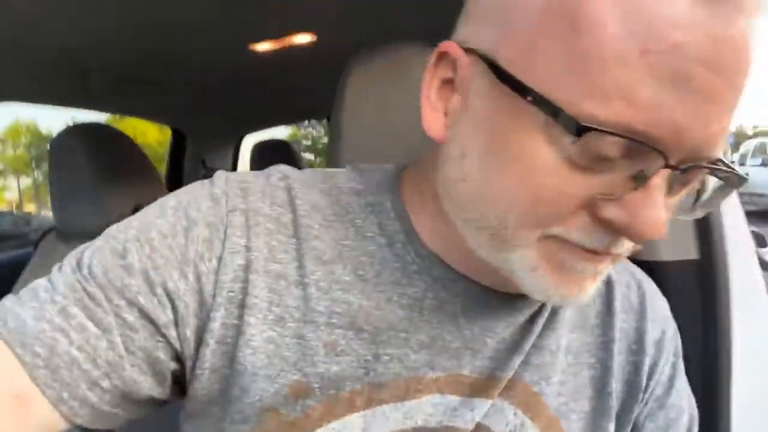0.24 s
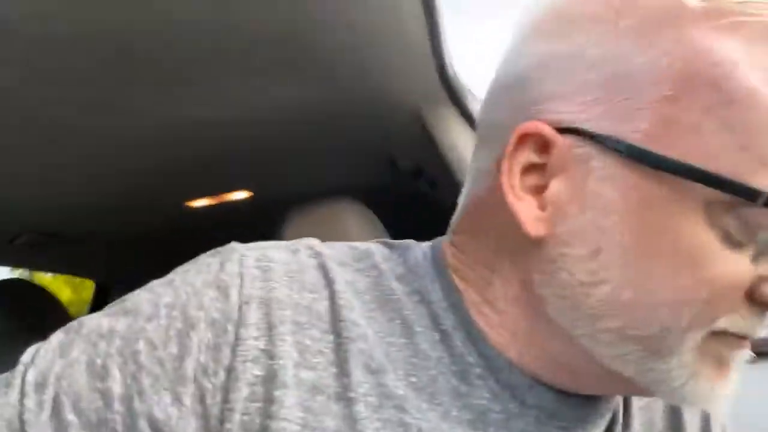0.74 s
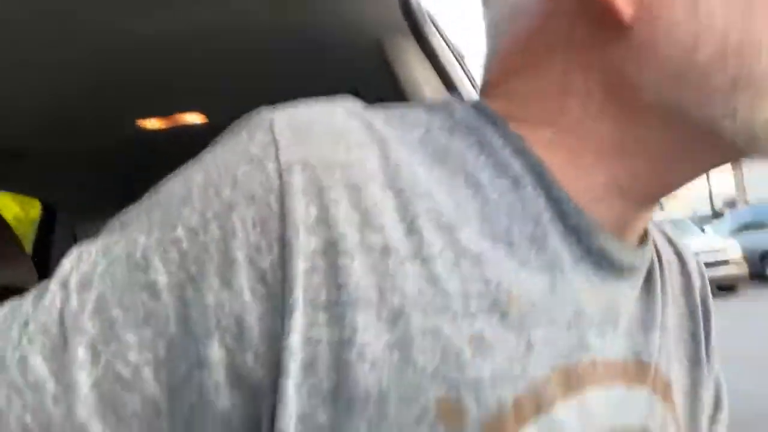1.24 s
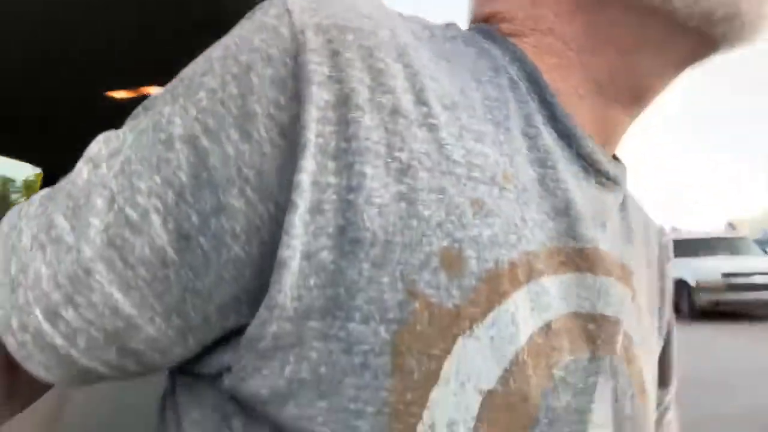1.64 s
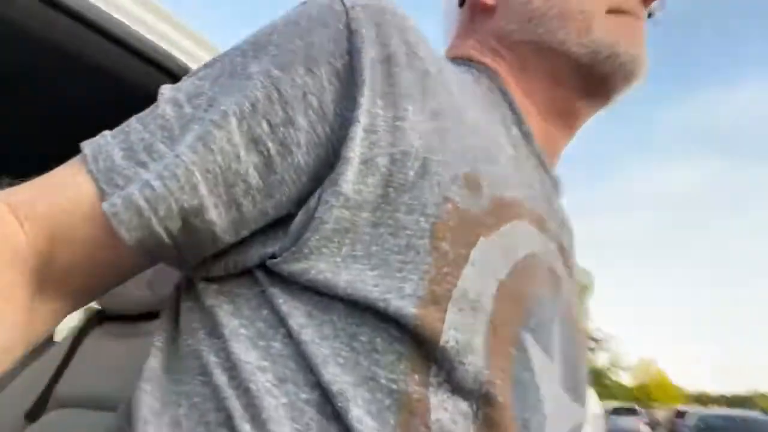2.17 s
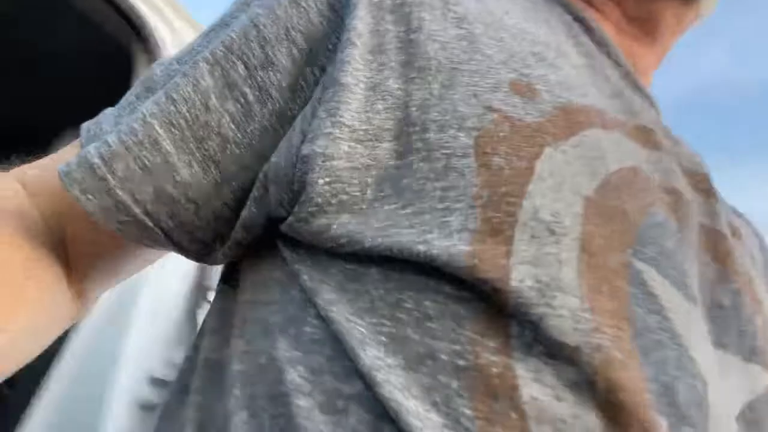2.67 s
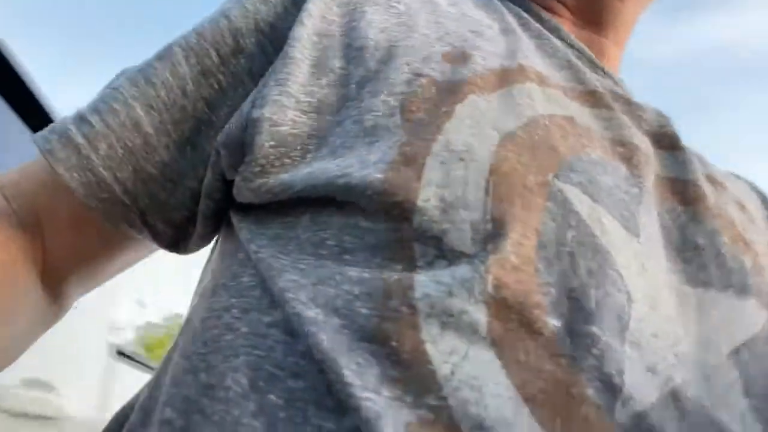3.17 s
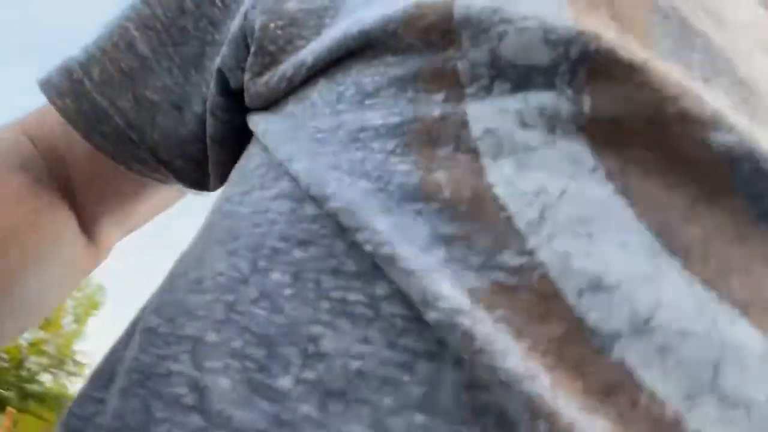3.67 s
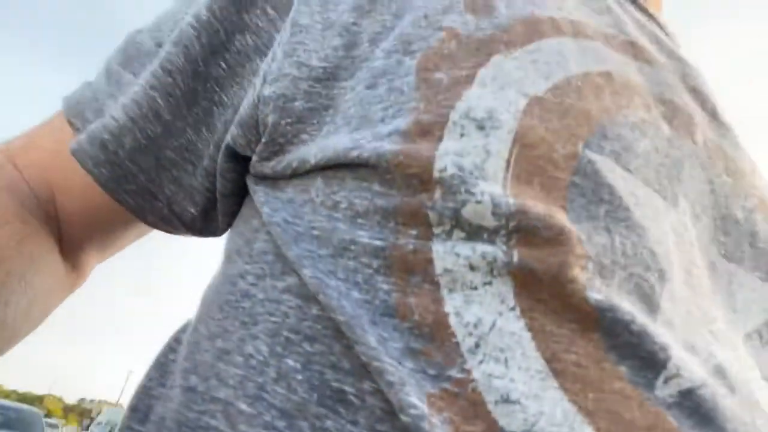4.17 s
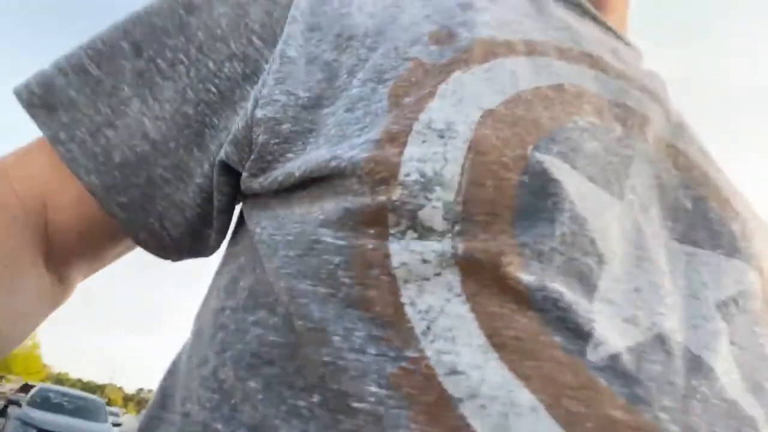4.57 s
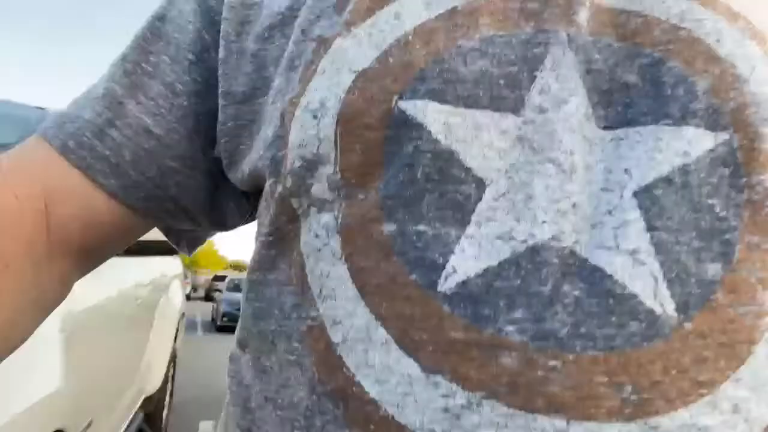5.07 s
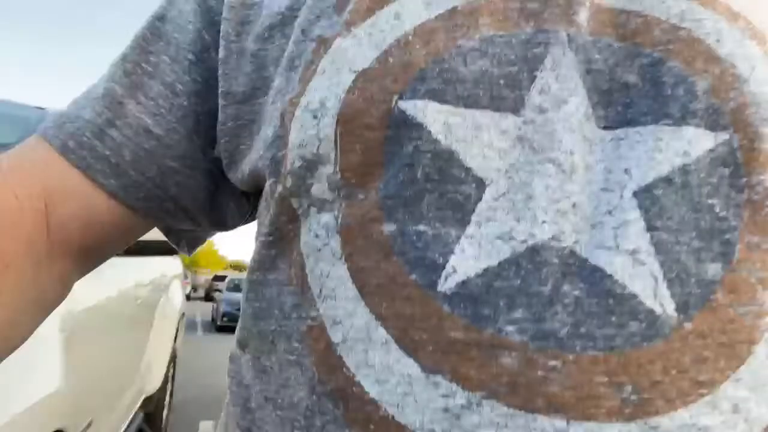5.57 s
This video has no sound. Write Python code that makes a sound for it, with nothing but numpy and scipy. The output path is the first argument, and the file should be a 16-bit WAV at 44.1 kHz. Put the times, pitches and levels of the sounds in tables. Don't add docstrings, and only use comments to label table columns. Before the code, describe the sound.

Two heavy car doors slam a few seconds apart in a parking lot, over low traffic rumble, faint hum and small handling clicks.

```python
import sys
import numpy as np
from scipy import signal
from scipy.fft import rfft, irfft
from scipy.io import wavfile
from scipy.ndimage import uniform_filter1d, minimum_filter1d

SR = 44100
rng = np.random.default_rng(int(sys.argv[2]) if len(sys.argv) > 2 else 0)


def natural_amplitude(level_db):
    exponent = np.asarray(level_db, float) / 20
    return 10 ** exponent


def wav_record(signal):
    frames = np.transpose(np.atleast_2d(signal))
    bounded = np.clip(frames, -1, 1)
    quanta = np.round(bounded * 32767).astype(np.int16)
    wavfile.write(sys.argv[1], SR, quanta)


N = 256397

# frequency in Hz, level in dB per Hz.
TRAFFIC = [(70, -30.5), (120, -8.5), (170, -12), (245, -17.5), (300, -23), (400, -30), (600, -30.5),
           (1300, -38.5), (2000, -40), (2350, -49.5), (4000, -51.5), (6200, -83), (7400, -69), (9000, -92)]
# frequency in Hz, level in dB per Hz.
RUMBLE = [(12, -20.5), (25, -5), (40, 2.5), (60, 3.5), (90, 5.5), (130, -8.5), (200, -21.5), (300, -68.5)]
# frequency in Hz, level in dB per Hz.
FIBRES = [(590, -27.5), (1000, -4), (1150, -8), (1650, -4), (2090, -11), (6470, -20), (7400, -14.5),
          (9620, -61), (16300, -120)]
# time in seconds, level in dB.
MOVEMENT = [(0.0, -53.5), (0.37, -47), (0.62, -49), (0.99, -46), (1.6, -42), (1.87, -48), (2.5, -53.5),
            (2.81, -49.5), (2.96, -55), (3.66, -52.5), (3.99, -54), (4.3, -50), (4.62, -51.5), (4.91, -51),
            (5.81, -53.5)]
# time in seconds, pitch in Hz, level in dB.
HUM = [(0.0, 108.9, -55), (0.2, 108.2, -36.5), (0.58, 114.5, -37.5), (0.71, 108.9, -44.5),
       (1.6, 109.6, -42), (2.07, 111.1, -35.5), (2.74, 111.9, -38.5), (2.9, 108.5, -43.5),
       (4.24, 108.6, -33.5), (4.3, 110, -52), (4.65, 110.9, -38.5), (5.254, 113.7, -32), (5.6, 110.9, -40),
       (5.81, 105, -45)]
# frequency in Hz, level in dB.
HUM_OVERTONES = [(285.3, -56.5), (376.8, -65.5), (495.3, -79.5)]
# start in seconds, peak in dB, pitch in Hz, length in cycles.
THUMPS = [(0.027, -20.5, 90, 1.9), (0.552, -21, 66, 2.5), (0.82, -47, 61, 3.7), (1.13, -12, 38.6, 1.3),
          (1.11, -11, 29, 2.2), (4.38, -12, 30, 1.8), (1.241, -15, 48, 5.5), (2.619, -25, 74.5, 4.4),
          (3.962, -20.5, 68, 3.4), (4.207, -18, 60, 2.3), (5.496, -25.5, 56.5, 2.8)]
# frequency in Hz, level in dB per Hz.
CLOTH = [(300, -26.5), (600, -5.5), (1200, -4), (2100, -9.5), (4000, -15.5), (7400, -21.5)]
# start in seconds, length in seconds, level in dB, treble dullness in dB.
SWISHES = [
    (1.151, 0.27, -46, -6),
    (1.613, 0.19, -43.5, -0.5),
    (2.014, 0.074, -52, -1),
    (2.864, 0.095, -54, 2),
    (3.428, 0.18, -49.5, 16),
    (3.7, 0.15, -58, -1),
    (4.121, 0.13, -55.5, -2),
    (4.313, 0.038, -50, 0),
    (4.429, 0.22, -51.5, 4.5),
    (5.597, 0.15, -54.5, 7),
]
# time in seconds, level in dB, upper resonance in Hz.
CREAKS = [
    [(0.255, -59, 1850), (0.29, -47, 1950), (0.303, -50, 1930), (0.322, -42, 2040), (0.35, -47, 2060),
     (0.385, -56, 2050)],
]
# start in seconds, peak in dB, ring in Hz, decay t60 in seconds.
TRIM = [(.0802, -42.5, 3340, 0.014), (.3464, -41, 4540, 0.033), (.5736, -44, 5800, 0.04),
        (1.4197, -35, 6360, 0.058), (1.4676, -22, 1890, 0.042), (1.483, -28, 2552, .057),
        (1.6033, -33, 2390, 0.066), (2.0612, -46, 1550, 0.049), (2.0906, -44.5, 1710, 0.061),
        (2.2348, -45, 2602, 0.0063), (2.236, -36, 3300, 0.015), (2.3935, -48, 4320, 0.038),
        (2.642, -30.5, 1300, .012), (2.6863, -42, 4600, 0.026), (2.9148, -45, 4060, 0.043),
        (3.9514, -43, 2546, .028), (4.125, -44.5, 3580, 0.04), (4.2423, -37.5, 2840, 0.052),
        (4.479, -32.5, 2300, 0.041), (4.49, -33.5, 4270, 0.077), (4.52, -36, 3300, 0.03),
        (4.563, -39.5, 2720, .028), (5.0529, -47, 1670, 0.024), (5.2525, -49.5, 1848, 0.025)]
# start in seconds, peak in dB, ring in Hz, decay t60 in seconds.
KEYS = [(.4614, -39, 4770, 0.052), (.857, -51, 1670, .028), (.9981, -40, 5500, 0.027),
        (1.2094, -31, 3850, .041), (1.2481, -41, 1820, 0.026), (1.3578, -29.5, 1870, 0.051),
        (1.4421, -30, 2880, 0.048), (1.9305, -41.5, 4620, 0.03), (2.6474, -26, 4560, 0.022),
        (2.6579, -27.5, 2800, 0.023), (3.9399, -36, 3530, 0.048), (4.8864, -45.5, 3800, .021)]
# start in seconds, peak in dB, ring in Hz, decay t60 in seconds.
BUCKLE = [(.17, -43.5, 3480, 0.13), (.19, -36, 1470, .11), (.1999, -29, 6350, 0.033),
          (.731, -32, 6800, 0.039), (.744, -37, 2820, 0.033), (.9398, -40, 3300, 0.028),
          (1.021, -36, 1640, 0.035), (1.07, -39, 1720, 0.028), (1.097, -38, 1364, 0.01),
          (1.294, -41, 4500, 0.044), (1.502, -20, 4600, 0.025), (1.511, -23, 1870, 0.037),
          (1.6666, -35.5, 4280, 0.035), (1.7314, -40, 3480, .038), (2.6114, -48, 3650, .027),
          (4.3206, -43, 2680, 0.033), (4.334, -41, 2910, .03)]
# start in seconds, peak in dB, ring in Hz, decay t60 in seconds.
PADDED = [
    (.9497, -36, 1670, .028),
    (2.3136, -46, 1560, 0.016),
    (2.3565, -52, 2550, 0.043),
    (2.9527, -46, 1410, 0.053),
    (3.236, -41, 2060, 0.022),
    (4.5394, -42.5, 4000, 0.022),
    (4.7536, -36.5, 3000, .013),
    (4.9945, -28.5, 3050, 0.021),
    (5.6346, -43.5, 1770, .032),
]
# start in seconds, peak in dB, ring in Hz, decay t60 in seconds.
TAPS = [
    (.724, -34, 1770, 0.032),
    (2.761, -43, 1400, 0.015),
    (3.458, -46, 1940, 0.045),
    (5.736, -36, 1611, 0.015),
]
# start in seconds, peak in dB, ring in Hz, decay t60 in seconds.
KNOCKS = [
    (.292, -59, 750, 0.03),
    (2.7337, -51.5, 452, 0.021),
    (3.241, -43, 720, 0.033),
    (3.242, -40, 513, 0.068),
    (3.834, -49, 595, 0.029),
]
# its contacts, low part in dB, high part in dB.
KINDS = [
    (TRIM, -25.5, -19),
    (KEYS, -22.5, -10),
    (BUCKLE, -8, -4.5),
    (PADDED, 0.5, -18),
    (TAPS, -3.5, -45),
    (KNOCKS, 19.7, -26),
]
# start in seconds, peak in dB, pitch in Hz, decay t60 in seconds.
PINGS = [(0.181, -50, 6300, 0.054), (.2, -43.5, 6980, 0.03), (.898, -44, 6440, 0.035), (.96, -60, 3300, .1),
         (1.246, -42, 3630, 0.052), (1.294, -33, 6200, 0.05), (1.503, -29, 1200, .03),
         (2.647, -36, 1600, .02), (2.648, -36, 6300, .02), (2.659, -37, 2050, .018),
         (1.358, -41, 4500, .03), (1.296, -45, 5670, 0.094), (1.445, -26, 6550, 0.036),
         (1.494, -38, 6020, .05), (1.503, -31, 885, 0.039), (1.596, -55, 5140, 0.18),
         (4.174, -47.5, 6480, 0.03), (4.341, -53.5, 5070, 0.076), (4.52, -37.5, 6600, 0.021)]
# start in seconds, peak in dB, pitch in Hz, decay t60 in seconds.
STRIKER = [(1.107, 0, 1373, .042), (1.09, -34, 1200, 0.043), (1.121, -17, 2800, .02),
           (1.160, -26, 1700, .06), (1.178, -30, 1550, .08), (1.178, -39, 2850, .08),
           (1.141, -20, 1950, .04), (4.386, -11, 800, 0.06), (4.412, -9.5, 473, .04),
           (1.1065, -5.5, 1916, .03), (1.109, -12.5, 3400, .02), (1.11, -6, 357, .07),
           (1.113, -17, 720, .04), (1.143, -21, 2550, .03), (1.140, -20.5, 2200, 0.036),
           (4.367, -18, 270, 0.045), (4.3805, -12.5, 3200, 0.028), (4.380, -19.5, 5800, .02),
           (4.4075, -9, 1570, .045), (4.409, -16, 2550, .03), (4.409, -19, 3600, .025),
           (4.369, -13, 380, .045), (4.379, -11, 180, .14), (4.384, -11.5, 255, .12),
           (4.4105, -5, 320, .035), (4.47, -20.5, 240, 0.18)]
# start in seconds, peak in dB, pitch in Hz, decay t60 in seconds.
TRIM_RINGS = [(.196, -36, 1440, 0.034), (.200, -41, 820, .03), (.200, -41, 2650, .025),
              (.462, -44, 4804, .03), (.724, -29, 1760, .035), (.724, -38, 1174, .02),
              (2.2347, -31.5, 2550, 0.021), (2.236, -34, 3300, .018), (2.236, -42.5, 1590, .04),
              (2.252, -46, 2600, .02), (2.314, -47, 1550, .025), (2.357, -47, 2600, .02),
              (2.394, -47, 2600, .02), (2.404, -50, 4300, 0.018), (2.611, -49, 4800, 0.017),
              (2.647, -27, 4565, .02), (2.648, -34, 5000, .025), (2.658, -34, 2750, .015),
              (2.659, -38, 3800, .014), (2.647, -35, 2100, .02), (2.647, -36, 3900, .02),
              (2.687, -48, 2650, 0.023), (2.735, -44, 1300, .02), (2.761, -32, 1500, .02),
              (2.762, -38, 684, .02), (2.761, -35, 1200, .016), (3.241, -37, 760, 0.037),
              (3.834, -35, 598, .025), (3.242, -38, 500, .04), (3.242, -40, 1000, .03),
              (3.459, -42, 1900, .04), (.293, -41, 750, .025), (3.835, -40, 1044, .03),
              (1.502, -22, 4650, .02), (1.502, -25, 2700, .02), (1.502, -27, 6300, .03),
              (1.512, -24, 2000, .035), (1.358, -36, 1900, .04), (1.468, -28, 2900, .025),
              (1.483, -34, 4000, .025), (1.604, -38, 2300, .04), (1.667, -40, 4500, .025),
              (4.521, -42, 2150, .03), (4.124, -51, 2540, .03), (4.163, -49, 2450, .04),
              (4.322, -45, 2500, .04), (4.995, -37, 1200, .03), (5.736, -38, 1600, .025)]
# peak time in seconds, level in dB, pitch in Hz, rise in seconds, t60 in seconds.
BOOMS = [
    (1.132, -5, 90, 0.022, 0.083),
    (1.183, -3, 63, .035, 0.1),
    (1.225, -19, 65, .02, 0.094),
    (1.301, -19, 80.06, .045, 1.04),
    (4.4, -7.5, 67, 0.0272, .1),
    (4.427, -10, 58, 0.0198, 0.25),
    (4.45, -18.5, 108.5, 0.028, 0.2),
    (4.559, -27.5, 56.6, .08, 0.92),
]
# frequency in Hz, level in dB, decay t60 in seconds.
FIRST_PANEL = [(90, 16.5, 0.2), (125.5, -2.5, 0.48), (204, -3, 0.43), (343, 2.5, 0.14), (480, -7, 0.12),
               (900, -19, 0.081), (1500, -33.5, .05)]
SECOND_PANEL = [(90, 7, 0.31), (130, -2.5, 0.63), (202, -4, 0.45), (286, 10.5, 0.13), (487, 2.5, 0.068),
                (930, -7.5, 0.13), (1544, -28.5, 0.044)]
# frequency in Hz, level in dB, decay t60 in seconds.
FIRST_RINGS = [(209.5, 5.9, 0.26), (347, 5.7, 0.023), (800, 2, 0.0069)]
SECOND_RINGS = [(184, -2, 0.044), (264, 0, 0.074), (338, -3, 0.051), (401, 11, 0.095), (800, 2, 0.016)]
# frequency in Hz, level in dB per Hz.
FIRST_LATCH = [(290, -20.5), (500, 3), (725, -22), (849, -17.5), (1220, -22), (1380, -18), (2210, -20.5),
               (3210, -22.5), (6390, -31.5), (7400, -29.5), (9620, -68), (16300, -120)]
SECOND_LATCH = [(290, -45), (500, -18.5), (803, -4.5), (1080, -14.5), (1580, -13), (2070, -16),
                (2560, -15.5), (2870, -18.5), (5840, -33.5), (7400, -26), (9620, -83.5), (16300, -120)]
# start in seconds, latch crack in dB, panel thud in dB, dullness in dB per octave.
FIRST_BLOWS = [
    (1.091, -30.5, -23, 3.5),
    (1.099, -22, -32, 7.5),
    (1.1065, -5.5, -15.5, 1.1),
    (1.113, -28.5, -10.5, 0),
    (1.121, -19, -18, 2.2),
    (1.138, -16, -15, 3),
    (1.158, -24.5, -30, 2.5),
    (1.215, -35.5, -18.5, 5.5),
    (1.240, -54, -24.5, 3.5),
]
SECOND_BLOWS = [
    (4.344, -39, -31, 5.2),
    (4.364, -16, -21.5, 7.4),
    (4.378, -7, -10, 1.2),
    (4.387, -16, -18, 2.06),
    (4.405, -8.5, -15, 0.89),
    (4.411, -22, -17, 4),
    (4.425, -52, -35.5, 11),
    (4.438, -30.5, -26, 3.2),
    (4.478, -52, -24.5, 10.4),
    (4.53, -52, -37, 15),
]


def evened(x):
    return x / np.sqrt(np.mean(x ** 2) + 1e-20)


def curve(rows, t):
    s, *columns = np.transpose(rows)
    return [np.interp(t, s, c) for c in columns]


def coloured(x, points):
    f, db = np.transpose(points)
    hz = np.fft.rfftfreq(len(x), 1 / SR)
    gain = natural_amplitude(np.interp(np.log(hz + 1), np.log(f + 1), db))
    return irfft(rfft(x) * gain, len(x))


def slow(rate_hz):
    z = rfft(rng.standard_normal(N))
    below = np.fft.rfftfreq(N, 1 / SR) < rate_hz
    return evened(irfft(z * below, N))


def resonate(x, hz, width):
    turn = np.exp(2j * np.pi * np.cumsum(hz * np.ones(len(x))) / SR)
    r = np.exp(-np.pi * width / SR)
    return 2 * (turn * signal.lfilter([1 - r], [1, -r], x / turn)).real


def add(mix, s, sound):
    part = mix[round(s * SR):][:len(sound)]
    part += sound[:len(part)]


def lot():
    cloth_db, = curve(MOVEMENT, np.arange(N) / SR)
    wash = evened(coloured(rng.standard_normal(N), TRAFFIC)) * natural_amplitude(-42 + 2.02 * slow(6.7))
    rumble = evened(coloured(rng.standard_normal(N), RUMBLE)) * natural_amplitude(-38 + 2.6 * slow(7.1))
    fibres = rng.standard_normal(N) * natural_amplitude(0.5 * slow(170.0))
    rustle = evened(coloured(fibres, FIBRES)) * natural_amplitude(cloth_db - 6.5)
    return wash + rumble + rustle


def hum():
    hz, db = curve(HUM, np.arange(N) / SR)
    out = natural_amplitude(db + 2.2 * slow(13.0)) * np.sin(2 * np.pi * np.cumsum(hz) / SR)
    for line_hz, line_db in HUM_OVERTONES:
        level = natural_amplitude(line_db + 3.4 * slow(2.3))
        phase = 2 * np.pi * np.cumsum(line_hz * (1 + 0.002 * slow(3.0))) / SR
        out += level * np.sin(phase)
    return np.sqrt(2) * out


def whine():
    start_s, hz, width_hz, level_db = 4.45, 4880, 150, -75
    since = np.arange(N) / SR - start_s
    line = resonate(resonate(rng.standard_normal(N), hz, width_hz), hz, width_hz)
    return evened(line) * natural_amplitude(level_db + 2.5 * slow(6.5) - 3.0 * since) * (since > 0)


def thump(db, hz, cycles):
    t = np.arange(round(cycles / hz * SR)) / SR
    return natural_amplitude(db) * np.sin(2 * np.pi * hz * t) * np.hanning(len(t))


def swish(length, db, dull_db):
    count = round(length * SR)
    clumps = natural_amplitude(9.7 * uniform_filter1d(rng.standard_normal(SR // 2), size=150))
    cloth = coloured(rng.standard_normal(SR // 2), CLOTH)
    cloth = coloured(cloth, [(2500, 0.0037), (5000, -dull_db)])
    return natural_amplitude(db) * evened(cloth * clumps)[:count] * signal.windows.tukey(count, 0.6)


def creak(rows):
    t = np.arange(rows[0][0], rows[-1][0], 1 / SR)
    db, hz = curve(rows, t)
    jerks = rng.random(len(t)) < 900 / SR
    slips = rng.standard_normal(len(t)) * (0.47 + 2.0 * jerks)
    seat = evened(resonate(resonate(slips, hz, 270.0), hz, 500.0))
    seat += 0.47 * evened(resonate(slips, 0.39 * hz, 150.0))
    seat += 0.25 * evened(resonate(slips, 1.15 * hz, 150.0))
    return natural_amplitude(db) * seat * signal.windows.tukey(len(t), 0.3)


def click(db, hz, low_db, high_db, t60, noise):
    t = np.arange(len(noise)) / SR
    burst = noise * natural_amplitude(-60 * t / np.clip(t60, 0.004, 0.2)) * np.minimum(t / 0.00063, 1)
    scratch = coloured(burst, [(200, low_db - 14.0), (800, low_db + 8.0), (2500, 0.024),
                               (5500, high_db + 3.5), (9000, high_db + 6.5)])
    ring = resonate(resonate(burst, hz, 150 + hz / 6), hz, 300 + hz / 4)
    sound = evened(scratch) + 0.33 * evened(ring)
    middle = coloured(sound, [(1300, -40), (1500, 0), (4000, 0), (4400, -40)])
    return natural_amplitude(db) * sound / abs(middle).max()


def ping(db, hz, t60):
    t = np.arange(round(t60 * SR)) / SR
    pair = np.sin(2 * np.pi * hz * t) + 0.5 * np.sin(2 * np.pi * 1.035 * hz * t)
    return natural_amplitude(db - 60 * t / t60) * pair * np.minimum(t / 0.00039, 1)


def bodywork(x):
    t = np.arange(SR // 3) / SR
    taps = rng.standard_normal(len(t)) * (rng.random(len(t)) < 2000 / SR) * (t > 0.004)
    bright = taps * natural_amplitude(-60 * t / 0.056)
    dull = coloured(taps, [(100, -10.0), (250, 3.5), (600, -1.0), (2000, -17), (7000, -20.5)])
    dull = dull * natural_amplitude(-60 * t / 0.53)
    return signal.oaconvolve(x, 0.061 * bright + 0.013 * dull)[:N]


def boom(s, db, hz, rise, t60):
    t = np.arange(-rise, t60, 1 / SR)
    turn = 2 * np.pi * hz * (t + rise)
    swell = np.sin(np.pi / 2 * np.minimum(1 + t / rise, 1)) ** 2
    decay = natural_amplitude(db - 60 * np.maximum(t, 0) / t60)
    tone = np.sin(turn) + 0.12 * np.sin(2 * turn)
    return s - rise, np.sqrt(2) * swell * decay * tone


def panel(spread, rings, count):
    f, db, t60 = np.transpose(spread)
    place = np.log(np.geomspace(f[0], f[-1], count)) + 0.036 * rng.standard_normal(count)
    mode_db = np.interp(place, np.log(f), db)
    mode_t60 = np.interp(place, np.log(f), t60)
    dense = np.transpose([np.exp(place), mode_db, mode_t60])
    t = np.arange(SR // 2) / SR
    ring = np.zeros(len(t))
    for hz, level_db, decay_s in [*dense, *rings]:
        ring += natural_amplitude(level_db - 60 * t / decay_s) * np.sin(2 * np.pi * (hz * t + rng.random()))
    return ring * np.sin(np.pi / 2 * np.minimum(t / 0.003, 1)) ** 2


def slam(blows, latch, body):
    crack, push, t = np.zeros(N), np.zeros(N), np.arange(8192) / SR
    for (s, crack_db, thud_db, dull_db), noise in zip(blows, rng.standard_normal((len(blows), 2, 8192))):
        t60 = 0.032 + 0.022 * dull_db
        rise = 0.00067 + 0.00081 * dull_db
        start = np.minimum(t / max(rise, 1e-4), 1)
        grit = coloured(noise[0], latch)
        grit = coloured(grit, [(250, -17.5), (500, -11.0), (1000, 0.0), (8000, -3 * dull_db)])
        add(crack, s, evened(grit) * start * natural_amplitude(crack_db - 60 * t / t60))
        add(push, s, noise[1] * start * natural_amplitude(thud_db - 60 * t / 0.021))
    return crack + 0.056 * signal.oaconvolve(push, body)[:N]


def scene():
    near = slam(FIRST_BLOWS, FIRST_LATCH, panel(FIRST_PANEL, FIRST_RINGS, count=70))
    near += slam(SECOND_BLOWS, SECOND_LATCH, panel(SECOND_PANEL, SECOND_RINGS, count=70))
    for rows, low_db, high_db in KINDS:
        for (s, db, hz, t60), noise in zip(rows, rng.standard_normal((len(rows), 8192))):
            add(near, s, click(db, hz, low_db, high_db, t60, noise))
    for s, *look in PINGS + STRIKER + TRIM_RINGS:
        add(near, s, ping(*look))
    for rows in CREAKS:
        add(near, rows[0][0], creak(rows))
    for s, *look in SWISHES:
        add(near, s, swish(*look))
    near = near + bodywork(near)
    for row in BOOMS:
        add(near, *boom(*row))
    for s, *look in THUMPS:
        add(near, s, thump(*look))
    return (near + lot() + hum() + whine())[None]


def roll_off(x):
    return signal.sosfilt(signal.butter(12, 7550, fs=SR, output="sos"), x)


def record(dry):
    narrow = coloured(dry[0], [(5800, 0), (6700, -5), (7540, -24), (7560, -60), (7650, -100)])
    reach = -minimum_filter1d(-abs(narrow), size=241)
    gain = np.minimum(0.9 / reach, 1)
    held = narrow * uniform_filter1d(uniform_filter1d(gain, size=121), size=121)
    held = coloured(held, [(7550, 0), (7800, -40)])
    return roll_off(held[None])


dry = scene()
out = record(dry)
wav_record(out)
```